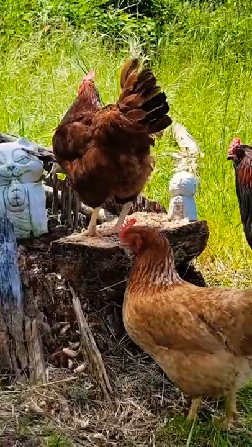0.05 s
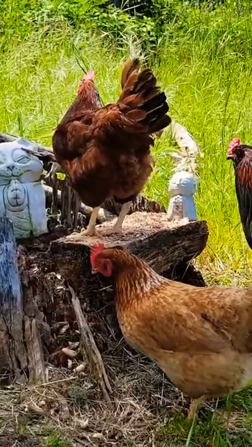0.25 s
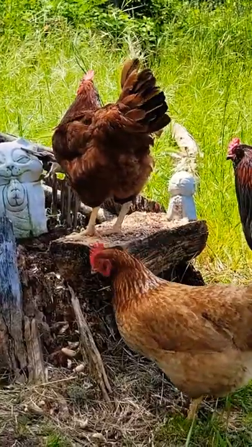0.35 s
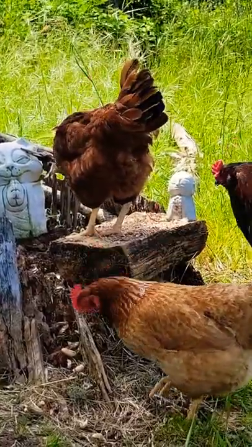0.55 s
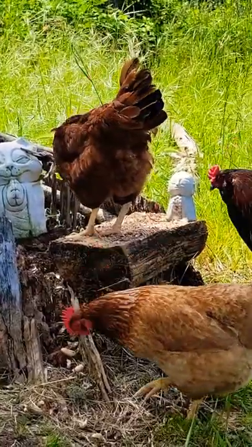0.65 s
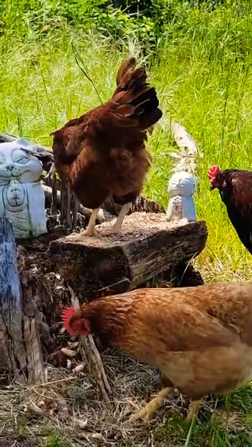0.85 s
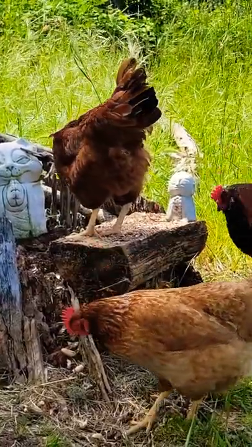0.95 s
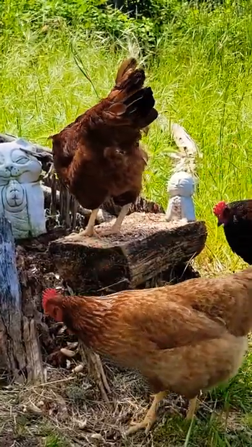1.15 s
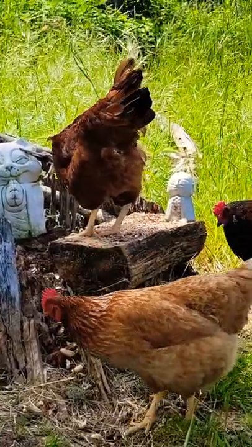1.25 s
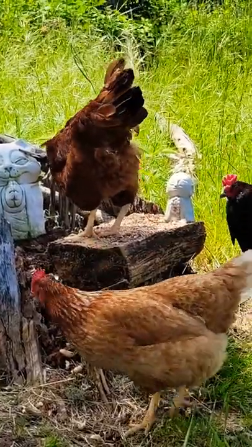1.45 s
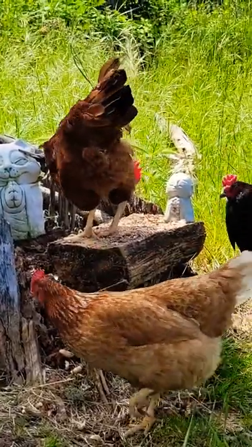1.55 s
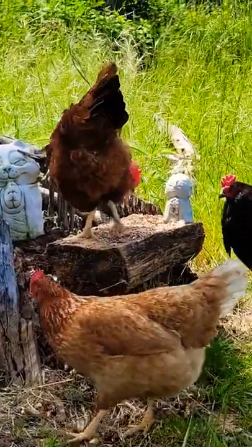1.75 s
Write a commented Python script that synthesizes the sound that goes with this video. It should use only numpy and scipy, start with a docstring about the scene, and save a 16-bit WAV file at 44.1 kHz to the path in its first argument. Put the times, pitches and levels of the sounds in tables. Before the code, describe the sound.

A bird gives two short, harsh chirps close by, with wind bumping the microphone.

```python
"""A bird close by gives two short, harsh chirps in a backyard where hens walk on straw.
Each chirp is a thin falling lead-in, an arched note, a rasp, and a lower arched note.
The notes are sliding tones and the rasp is pulsing noise. Small birds whistle farther off,
there is one faint croon, and straw crackles softly underfoot. Wind nudges the left and
right microphones over a low hum and a distant wash of noise."""
import sys
import numpy as np
from scipy import signal
from scipy.fft import rfft, irfft
from scipy.io import wavfile
from scipy.ndimage import uniform_filter1d

SR = 44100
rng = np.random.default_rng(int(sys.argv[2]) if len(sys.argv) > 2 else 0)


def dump_mix(stems):
    """Bounce the given channels to the path in sys.argv[1] as a 16-bit WAV at rate SR."""
    frames = np.atleast_2d(stems).T  # one column per channel
    limited = np.clip(frames, -1, 1)  # hard clip at full scale
    pcm = np.round(limited * 32767).astype(np.int16)
    wavfile.write(sys.argv[1], SR, pcm)


N = 79380
T = np.arange(N) / SR
HZ = np.fft.rfftfreq(N, 1 / SR)
JITTER_HZ = 500  # how fast the tones tremble


# The chirps: t/s, gain of the tones/dB, gain of the rasp/dB, upward flick/Hz, pitch jitter/fraction
CHIRPS = [(.622, -3, -1, 750, .016), (1.446, -2, 0, 400, .009)]

def near_bird():
    """Harsh chirps with one clear bounce, quick scatter from the ground and a faint tail from the yard."""
    chirps = np.zeros(N)
    for start, tone_db, rasp_db, flick_hz, jitter in CHIRPS:
        chirps += amp(tone_db) * (two_notes(start, flick_hz, jitter) + lead_in(start))
        chirps += amp(rasp_db) * rasp(start)
    bounce = amp(-16) * delay(chirps, lag_s=.006)
    ground = amp(-9) * echoes(chirps, fade_s=.11, rise_s=.0012)
    yard = amp(-17) * echoes(chirps, fade_s=.53, rise_s=.014)
    return both_mics(chirps) + bounce + ground + yard


# The voice, timed from the first note: t/s, f/Hz, level/dB
NOTES = [(-.022, 3480, -55), (-.003, 3520, -45), (.002, 3900, -33), (.010, 4650, -31.5), (.021, 4850, -27),
         (.032, 4100, -33), (.039, 4100, -56), (.062, 3430, -50), (.075, 3420, -39), (.079, 3400, -27.5),
         (.094, 3480, -28), (.105, 3200, -35), (.120, 3050, -52)]
# The tone colour of the bird's breath, which also shapes its overtone: f/Hz, level/dB
BREATH_COLOUR = [(300, -66.5), (1500, -14), (2300, -11), (3300, -2), (5000, 5), (6300, -2.5), (7500, -6),
                 (9300, -13.5), (10500, -8.5), (12800, -15.5), (15500, -21)]

def two_notes(start, flick_hz, jitter):
    """Two clear arched notes with a fading overtone; the second note flicks upward."""
    times, pitches, db = np.transpose(NOTES)
    flick_s, flick_spread_s, fade_db_per_s = .095, .007, 183.5
    flick = flick_hz * np.exp(-((T - start - flick_s) / flick_spread_s) ** 2)
    hz = np.interp(T, start + times, pitches) + flick
    phase = shaky_phase(hz, jitter)
    overtone_db = -10 + np.interp(2 * hz, *np.transpose(BREATH_COLOUR)) - fade_db_per_s * abs(T - start)
    voice = np.sqrt(2) * (np.sin(phase) + amp(overtone_db) * np.sin(2 * phase))
    shimmer = 1 + .17 * wander(JITTER_HZ)
    return voice * shimmer * envelope(start + times, db)


# The lead-in, timed from the first note: t/s, f/Hz, level/dB
LEAD_IN = [(-.056, 7400, -73), (-.026, 6500, -63), (-.017, 5850, -48), (-.009, 5830, -42.5), (0, 5850, -46),
           (.014, 6750, -55)]

def lead_in(start):
    """The bird's second voice: a thin whistle that falls into the first note and lifts as it fades."""
    times, pitches, db = np.transpose(LEAD_IN)
    hz = np.interp(T, start + times, pitches)
    return unit(np.sin(shaky_phase(hz, jitter=.024))) * envelope(start + times, db)


# The rasp, timed from the first note: t/s, upper band level/dB, lower band level/dB, breath level/dB
RASP_LEVELS = [(-.05, -75, -76, -63), (-.022, -57.5, -54, -54), (.004, -51.5, -56, -39),
               (.027, -49, -57, -42.5), (0.038, -42.5, -53, -45), (0.063, -42, -38.5, -46.5),
               (.08, -52, -49, -52.5), (.108, -57.5, -38.5, -55.5), (0.127, -59.5, -43.5, -62),
               (.15, -80, -78, -64)]

def rasp(start):
    """Each note breaks up into rough, pulsing noise near its own pitch, with a breathy hiss."""
    times, upper_db, lower_db, breath_db = np.transpose(RASP_LEVELS)
    pulses = unit(1 + .52 * np.sin(shaky_phase(hz=322.9, jitter=.5)))
    upper = warble(hz=4920) * envelope(start + times, upper_db)
    lower = warble(hz=3605) * envelope(start + times, lower_db)
    breath = colour(rng.standard_normal(N), BREATH_COLOUR) * envelope(start + times, breath_db)
    return pulses * (upper + lower + breath)


def warble(hz, width_hz=1170):
    """A narrow band of noise that flutters around one pitch."""
    phase = 2 * np.pi * hz * T
    return unit(wander(width_hz / 2) * np.cos(phase) + wander(width_hz / 2) * np.sin(phase))


# Far whistles: t/s, length/s, first f/Hz, middle f/Hz, last f/Hz, level/dB, pitch jitter/fraction
FAR_WHISTLES = [(.768, .044, 5850, 5900, 5800, -57, .012), (.803, .06, 5400, 4200, 3400, -65, .03),
                (1.01, .14, 5250, 5100, 4700, -64.5, .06), (1.055, .047, 4400, 4430, 3980, -61.5, .01),
                (1.083, .03, 6250, 6220, 6120, -66, .008), (1.108, .034, 6080, 5960, 5930, -58, .008),
                (1.13, .1, 5800, 3750, 3350, -66, .04), (1.35, .046, 5650, 5350, 3750, -63.5, .018),
                (1.69, .055, 5500, 5400, 4700, -60, .025)]

def far_birds():
    """Thin sliding whistles that swell and fade, some pure and some wheezy."""
    whistles = np.zeros(N)
    for start, length, first, middle, last, db, jitter in FAR_WHISTLES:
        progress = np.clip((T - start) / length, 0, 1)
        hz = np.polyval(np.polyfit([0, .5, 1], [first, middle, last], 2), progress)
        swell = np.sin(np.pi * progress)
        whistles += amp(db) * np.sqrt(2) * swell * np.sin(shaky_phase(hz, jitter))
    direct = np.array([whistles, delay(whistles, lag_s=.00003)])
    return direct + amp(-7) * echoes(whistles, fade_s=.17, rise_s=.002)


def croon(peak_s=.12, spread_s=.17):
    """One faint, low, held note, perhaps from a hen."""
    swell = np.exp(-((T - peak_s) / spread_s) ** 2)
    note = unit(np.sin(shaky_phase(hz=365, jitter=.125)))
    return both_mics(amp(-67) * swell * note)


# Presses on the straw: t/s, level/dB, swell and fade time/s
STRAW_PRESSES = [(.198, -66, 0.013), (1.72, -62, 0.063), (1.738, -55.5, 0.0067)]
# The tone colour of the snaps: f/Hz, level/dB
SNAP_COLOUR = [(500, -54), (2000, -3), (4500, 2.5), (7500, -3), (15000, -26)]

def straw(snaps_per_s=3000):
    """Straw underfoot gives clumps of tiny snaps that swell and die away quickly."""
    press = sum(amp(db) * np.exp(-abs(T - peak) / fade) for peak, db, fade in STRAW_PRESSES)
    snaps = rng.standard_normal((2, N)) * (rng.random(N) < snaps_per_s / SR)
    return colour(snaps, SNAP_COLOUR) * press


# Gusts on the microphones: t/s, rumble level/dB, flutter level/dB
GUSTS = [(0, -45.5, -60), (.055, -42, -63.5), (.15, -58, -82), (.39, -44.5, -85), (.51, -54, -61.5),
         (.565, -37, -43), (.609, -31, -52), (.665, -45.5, -57), (.745, -40, -56), (.795, -26, -51),
         (.9, -30.5, -56), (.94, -41, -62), (.965, -32, -47), (1.03, -34, -56), (1.141, -49.5, -61),
         (1.27, -44, -61.5), (1.5, -54, -71), (1.8, -58.5, -61.5)]
# The tone colours of the deep rumble and of the flutter above it: f/Hz, level/dB
RUMBLE_COLOUR = [(32, -11.5), (45, -6.5), (62, 0), (85, -1.5), (110, -12.5), (500, -87)]
FLUTTER_COLOUR = [(50, -21.5), (105, -11.5), (150, 0.5), (220, -10), (330, -19.5), (2000, -68)]

def wind(left_db=-3, right_db=6.5):
    """Wind bumps each microphone separately, with a heavier rumble on the right."""
    times, rumble_db, flutter_db = np.transpose(GUSTS)
    rumble = signal.hilbert(colour(rng.standard_normal((2, N)), RUMBLE_COLOUR))
    # Even out the noise's own swells so that the gusts set its loudness.
    rumble = rumble.real / np.sqrt(uniform_filter1d(abs(rumble) ** 2, size=1400, axis=1) / 2)
    rumble *= amp([[left_db], [right_db]]) * amp(np.interp(T, times, rumble_db))
    flutter = colour(rng.standard_normal((2, N)), FLUTTER_COLOUR)
    return rumble + flutter * amp(np.interp(T, times, flutter_db))


# The tone colour of the distance: f/Hz, level/dB
WASH_COLOUR = [(150, 12.5), (280, -3.5), (540, -1.5), (800, 4), (1250, 5.5), (1700, -0.5), (2200, -8.5),
               (3500, -7.5), (5500, -16), (10000, -28), (15500, -26)]

def distant_wash(shared=.64, fade_db_per_s=1.2):
    """Soft far-off noise, partly the same on both sides, that wavers and slowly fades."""
    left, other = rng.standard_normal((2, N))
    right = shared * delay(left, lag_s=.00013) + np.sqrt(1 - shared ** 2) * other
    db = -53.5 + .4 * wander(rate_hz=15) - fade_db_per_s * T
    return colour(np.array([left, right]), WASH_COLOUR) * amp(db)


def hum(hz=61.95, waver=.48):
    """A low hum that wavers in pitch and loudness."""
    tone = np.sin(2 * np.pi * hz * T + waver * wander(rate_hz=4.4))
    loudness = 1 + waver * wander(rate_hz=14.8)
    return amp(-45.5) * unit(tone * loudness)


def amp(db):
    """Turns decibels into a number to multiply by."""
    return 10 ** (np.asarray(db) / 20)


def unit(x):
    """Scales a sound to an average strength (rms) of 1."""
    return x / np.sqrt(np.mean(x ** 2) + 1e-20)


def colour(x, points):
    """Makes some frequencies louder than others, at an overall strength of 1."""
    hz, db = np.transpose(points)
    return unit(irfft(rfft(x) * amp(np.interp(np.log(HZ + 1), np.log(hz), db)), N))


def wander(rate_hz):
    """A smooth random wobble, up to about the given rate."""
    return unit(irfft(rfft(rng.standard_normal(N)) / (1 + (HZ / rate_hz) ** 4), N))


def shaky_phase(hz, jitter):
    """The growing angle of a tone with an unsteady pitch; its sine is the sound."""
    return 2 * np.pi * np.cumsum(hz * (1 + jitter * wander(JITTER_HZ))) / SR


def envelope(times, db):
    """A loudness curve through the points, silent before and after them."""
    return amp(np.interp(T, times, db)) * (T > times[0]) * (T < times[-1])


def delay(x, lag_s):
    """Makes a sound arrive a little later."""
    return irfft(rfft(x) * np.exp(-2j * np.pi * HZ * lag_s), N)


def echoes(x, fade_s, rise_s):
    """Many small reflections, different on each side, that drop 60 dB in fade_s."""
    taps = rng.choice([-1., 1.], (2, N)) * (rng.random((2, N)) < .12)
    taps *= amp(-60 * T / fade_s) * (1 - np.exp(-T / rise_s))
    taps /= np.linalg.norm(taps, axis=1, keepdims=True)
    return signal.fftconvolve(x[None], taps, axes=1)[:, :N]


# How far the right microphone trails the left for a near sound: f/Hz, phase/rad
RIGHT_LAG = [(0, 0), (2900, 1.2), (3500, 1.9), (4000, 3.1), (4800, 4.25), (15000, 13.3)]

def both_mics(x):
    """Sound reaches the left microphone first and bends around the recorder to the right one."""
    lag = np.interp(HZ, *np.transpose(RIGHT_LAG))
    return np.array([x, irfft(rfft(x) * np.exp(-1j * lag), N)])


def scene():
    """All the sounds of the yard, left and right."""
    return near_bird() + far_birds() + croon() + straw() + wind() + distant_wash() + hum()


# How much louder the left microphone hears than the right: f/Hz, level/dB
MIC_BALANCE = [(400, -0.5), (1300, -5.5), (2500, -1), (4500, -3.5), (8500, -1), (15000, 3)]

def record(dry):
    """The two microphones hear unequally, and the recorder cuts off the highest treble."""
    hz, db = np.transpose(MIC_BALANCE)
    left_gain = amp(np.interp(np.log(HZ + 1), np.log(hz), db) / 2)
    heard = irfft(rfft(dry) * np.array([left_gain, 1 / left_gain]), N)
    treble_cut = signal.firwin(511, cutoff=15600, window=("kaiser", 9), fs=SR)
    return signal.oaconvolve(heard, treble_cut[None], "same")


dry = scene()
out = record(dry)
dump_mix(out)
```